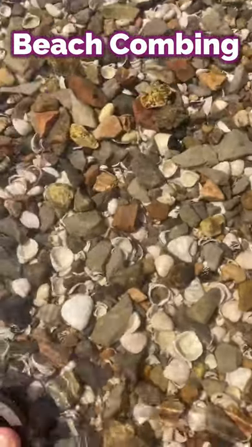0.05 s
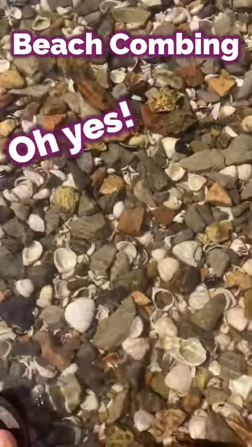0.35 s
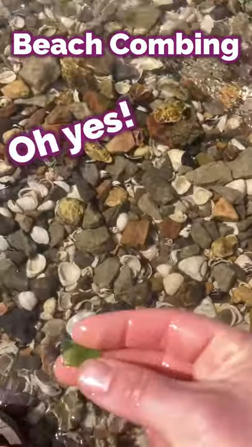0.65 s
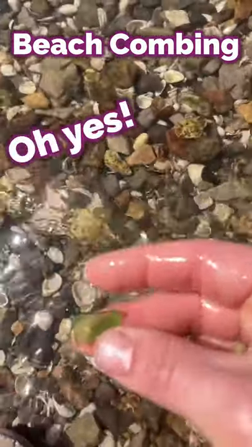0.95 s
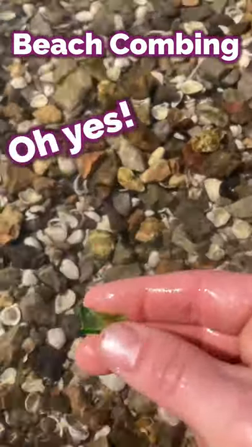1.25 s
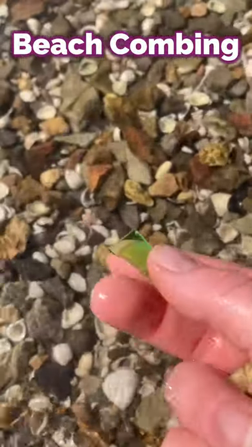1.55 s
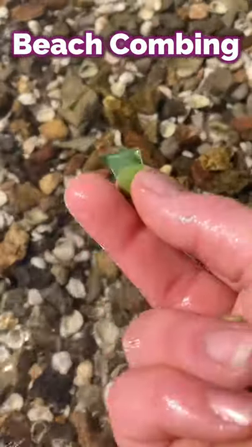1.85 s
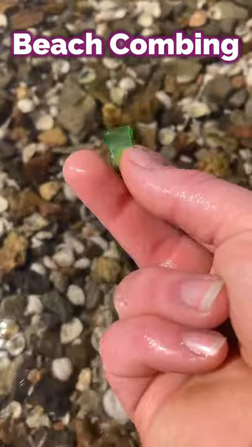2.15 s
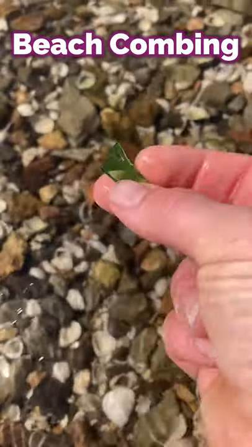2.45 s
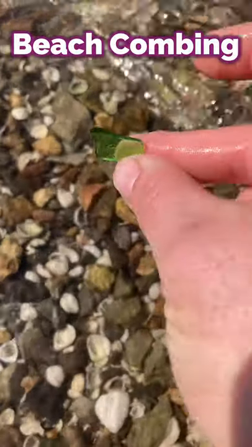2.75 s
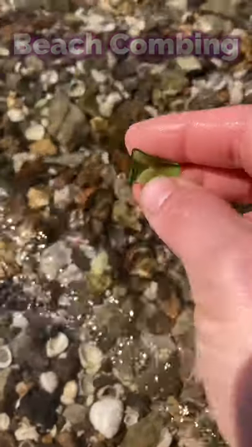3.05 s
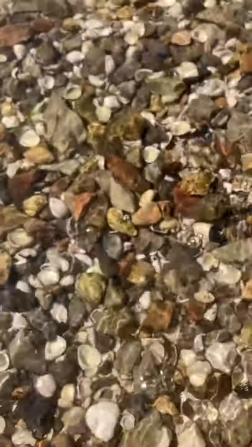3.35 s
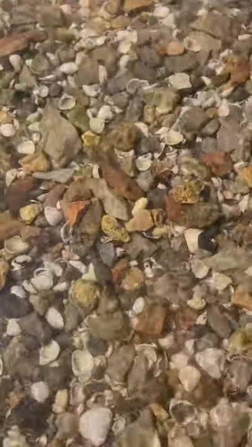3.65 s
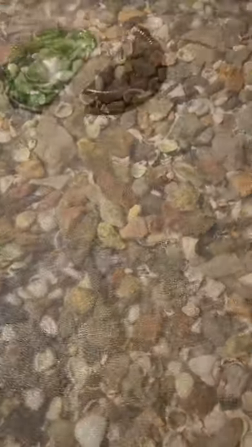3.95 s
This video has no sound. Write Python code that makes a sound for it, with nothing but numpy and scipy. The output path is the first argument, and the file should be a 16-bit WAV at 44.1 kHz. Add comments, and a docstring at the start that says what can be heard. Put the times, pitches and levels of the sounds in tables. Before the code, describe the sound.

Shallow seawater trickles and bubbles between stones close to a hand-held microphone, then sloshes and glugs as a fuller wavelet arrives. Wind rumbles and thumps softly on the microphone, with occasional pebble clicks and a faint sea murmur behind.

```python
"""Small waves lap over pebbles right below a hand-held phone. Bubbles ring as they surface, so the water
trickles, gurgles, fizzes and plinks over a soft wash. A fuller wavelet sloshes in during the second half, and
air squeezed between the stones glugs. The hand holding the phone scuffs on it, and pebble ticks, sprays and
thin whistles sound close by. The sea murmurs further off, and light wind rumbles and thumps on the phone's two
microphone openings (the ports)."""
import sys
import numpy as np
from scipy import signal
from scipy.fft import rfft, irfft
from scipy.io import wavfile
from scipy.ndimage import map_coordinates

SR = 44100
rng = np.random.default_rng(int(sys.argv[2]) if len(sys.argv) > 2 else 0)


def inscribe(sig):
    """Save sig as 16-bit PCM at rate SR to the path in sys.argv[1].

    A 1-D sig is mono; a 2-D sig holds one channel per row.
    Samples are clipped to [-1, 1] before scaling.
    """
    pcm = np.round(np.clip(np.atleast_2d(sig).T, -1, 1) * 32767)
    wavfile.write(sys.argv[1], SR, pcm.astype(np.int16))


N = 176400
BUBBLE_RISE = 0.018  # share of pitch a bubble gains while it fades to about a third


def undb(db):
    """Turn decibels into a gain."""
    return 10 ** (np.asarray(db) / 20)


def unit(x):
    """Scale to an average (rms) level of 1."""
    return x / np.sqrt(np.mean(x ** 2) + 1e-24)


def clock():
    """The time of every sample, in seconds."""
    return np.arange(N) / SR


def per_bin(points):
    """Join (Hz, value) points into a curve over all frequencies."""
    hz, value = np.array(points).T
    return np.interp(np.log(np.arange(N // 2 + 1) * SR / N + 1), np.log(hz), value)


def swell(curve):
    """Gain over time from (seconds, dB) points."""
    return undb(np.interp(clock(), *np.array(curve).T))


def colour(x, points):
    """Shape the tone with (Hz, dB) points; the result has level 1."""
    cepstrum = irfft(np.log(undb(per_bin(points))), N)
    cepstrum[1:N // 2] *= 2  # folded so the filter rings after a sound, never before
    cepstrum[N // 2 + 1:] = 0
    return unit(irfft(rfft(x) * np.exp(rfft(cepstrum)), N))


def noise(points):
    """Steady noise with the given tone."""
    return colour(rng.standard_normal(N), points)


def walk(rate):
    """Smooth random wandering of about 1 either way, at `rate` steps a second."""
    return map_coordinates(rng.standard_normal(4096), [clock() * rate], order=3, mode="wrap")


def add(out, start_s, sound):
    """Mix a short sound in at its time."""
    i = max(int(start_s * SR), 0)
    out[i:i + len(sound)] += sound[:max(N - i, 0)]


def resonate(x, hz, width_hz):
    """Let one band of a sound ring; the result has level 1."""
    band = signal.butter(2, [hz - width_hz / 2, hz + width_hz / 2], "band", fs=SR, output="sos")
    return unit(signal.sosfilt(band, x))


def knocks(table, rise_s, width):
    """Brief random pushes, each ringing in a broad band around its pitch."""
    out, t = np.zeros(N), clock()[:SR // 10]
    for start, hz, db in table:
        push = rng.standard_normal(len(t)) * t * np.exp(-t / rise_s)
        edges = [hz / (1 + width), min(hz * (1 + width), SR / 2 - 1)]
        ring = signal.sosfilt(signal.butter(3, edges, "band", fs=SR, output="sos"), push)
        add(out, start, undb(db) * ring / np.abs(ring).max())
    return out


def ports(x):
    """Sound from the ground reaches the two ports out of step, opposite at middle pitches."""
    # Each row: frequency in Hz, how far the left port leads in radians.
    phase = [(100, -27), (260, -3), (450, -2.5), (700, -4), (1100, -3), (2000, -3), (3200, -2),
             (3600, -1.67), (4000, 0.89), (6000, 0.5)]
    turn = np.exp(.5j * per_bin(phase))
    return np.array([irfft(rfft(x) * turn, N), irfft(rfft(x) / turn, N)])


def reflections(x, decay_s=0.0068):
    """Brief echoes from the stones, different at each port."""
    t = clock()[:SR // 20]
    echoes = rng.standard_normal((2, len(t))) * np.exp(-t / decay_s)
    return undb(-1.5) * np.array([signal.fftconvolve(x, e / np.linalg.norm(e))[:N] for e in echoes])


def bubble(hz, cycles, rise=BUBBLE_RISE, attack_cycles=3.3):
    """A ring that climbs as the bubble surfaces, fading to about a third in `cycles` vibrations."""
    turns = np.arange(int(6 * cycles * SR / hz)) * hz / SR
    age = turns / cycles
    attack = 1 - np.exp(-(turns / attack_cycles) ** 2)
    return np.sin(2 * np.pi * turns * (1 + rise * age / 2)) * np.exp(-age) * attack


def swarm(count, low_hz, high_hz, cycles, spread_db):
    """Bubbles of random size, strength and ring, scattered in time."""
    out = np.zeros(N)
    for when, size, strength, ring, glide in rng.random((count, 5)):
        hz = low_hz * (high_hz / low_hz) ** size
        gain = undb(spread_db * min(-np.log(strength), np.pi)) * np.sqrt(hz / low_hz)
        add(out, when * N / SR, gain * bubble(hz, cycles * 2 ** (2 * ring - 1), 2 * glide * BUBBLE_RISE))
    return out


def water(bubbles, tone, flow, wash_db, below=True):
    """Bubbles over a restless wash, swelling with the flow; `below` means right under the phone."""
    restless = undb(3.7 * walk(28.02))
    near = colour(bubbles, tone) + undb(wash_db) * restless * noise(tone)
    heard = ports(near) + undb(-8) * reflections(near) if below else near + reflections(near)
    return unit(heard) * swell(flow)


def trickle():
    """Water runs between the stones with ringing bubbles and clumps of crackle."""
    # Each row: time in seconds, level in dB.
    flow = [(0, -60.5), (.2, -64), (.45, -64), (.6, -62), (0.951, -65), (1.2, -57.5), (1.42, -61),
            (1.65, -73), (1.9, -63), (2.08, -74.5), (2.249, -59.5), (2.45, -64), (2.749, -54.5),
            (3.05, -58.5), (3.3, -59.5), (3.55, -59.5), (3.849, -64), (4, -62.5)]
    # Each row: frequency in Hz, level in dB.
    tone = [(200, -29.5), (500, -16), (800, -5), (1150, 3.5), (1650, 8.5), (2400, 2), (3200, -2.5),
            (4600, -8), (5600, -12.5), (7500, -33.5), (12000, -54)]
    bubbles = swarm(count=900, low_hz=850, high_hz=4800, cycles=6, spread_db=4.5)
    crackle = swarm(count=3000, low_hz=900, high_hz=5000, cycles=2, spread_db=4)
    clumps = unit(crackle * undb(3.24 * walk(60)))
    return water(unit(bubbles) + undb(-4) * clumps, tone, flow, wash_db=-7.5)


def gurgle():
    """Deeper bubbles ring in the wavelets."""
    # Each row: time in seconds, level in dB.
    flow = [(0, -81), (.45, -69.5), (.73, -56.5), (.87, -75), (1.13, -63.5), (1.6, -73), (2.15, -67),
            (2.27, -57), (2.36, -62), (2.52, -57), (2.68, -51), (2.88, -78), (3.01, -51.5), (3.2, -72),
            (3.52, -64), (4, -76)]
    # Each row: frequency in Hz, level in dB.
    tone = [(150, -12), (300, 0), (520, 0), (660, -5.5), (800, -13.5), (1000, -12.5), (1500, -23.5),
            (4000, -71.5)]
    bubbles = swarm(count=420, low_hz=300, high_hz=1200, cycles=4, spread_db=3)
    return water(bubbles, tone, flow, wash_db=-5)


def fizz():
    """Tiny bubbles ring in a thin sheet of water."""
    # Each row: time in seconds, level in dB.
    flow = [(0, -70), (.4, -73), (0.649, -69), (1, -76), (1.3, -70.5), (1.72, -75), (1.95, -72),
            (2.1, -78.5), (2.45, -68), (2.66, -65), (2.88, -87.5), (3.1, -68), (3.3, -71), (3.53, -64.5),
            (3.8, -69.5), (4, -69.5)]
    # Each row: frequency in Hz, level in dB.
    tone = [(800, -21.5), (2000, 5), (3300, 5), (4500, 4.5), (5400, -10.5), (6500, -9), (7600, -20),
            (10000, -31), (13000, -45.5)]
    bubbles = swarm(count=1600, low_hz=2400, high_hz=6000, cycles=5, spread_db=3.5)
    return water(bubbles, tone, flow, wash_db=-2, below=True)


def wind():
    """Gusts rumble on the ports."""
    # Each row: time in seconds, level in dB.
    gusts = [(0, -43.5), (.7, -42), (.88, -44), (1.1, -41), (1.42, -44), (1.65, -42), (2.05, -41),
             (2.35, -45), (2.65, -40.5), (2.85, -44.5), (2.93, -40.5), (3.2, -42), (3.42, -36.5),
             (3.62, -42.5), (3.76, -44.5), (4, -41.5)]
    # Rumble both ports share. Each row: frequency in Hz, level in dB.
    shared_tone = [(15, -20), (28, -8), (42, 0.5), (66, 1.5), (100, -1.5), (150, -11.5), (220, -18.5),
                   (320, -26.5), (480, -37), (800, -74), (1500, -85.5)]
    # Rumble that differs between them. Each row: frequency in Hz, level in dB.
    side_tone = [(15, -25.5), (30, -14.5), (60, -7), (100, 0), (150, -14.5), (220, -13.5), (320, -21),
                 (480, -37.5), (700, -58.5), (1500, -77)]
    shared, side = noise(shared_tone), undb(-8.5) * noise(side_tone)
    return unit(np.array([shared + side, shared - side])) * swell(gusts) * undb(walk(16))


def distant_sea():
    """The sea further off makes a softly wavering murmur."""
    # Each row: frequency in Hz, level in dB.
    tone = [(100, -11.5), (200, 4.5), (350, -2.5), (520, 12.5), (600, 2), (700, -31), (900, -19),
            (1500, -14.5), (4000, -37.5), (6000, -42), (8000, -38.5), (12000, -60)]
    murmur = ports(noise(tone)) + undb(-3) * np.array([noise(tone), noise(tone)])
    return undb(-61.5) * unit(murmur) * undb(2 * walk(14))


def scuffs(attack_s=0.0042):
    """Short rubs of a hand on the phone: a rasp over a hollow body, two rings, and fine grit on top."""
    # Each row: start, hold and fade in seconds, level in dB, body in dB, low ring in Hz and dB,
    # high ring in Hz and dB, grit in dB. Body, rings and grit are relative to the rasp.
    rubs = [(0.017, 0.025, 0.024, -47.5, -3.5, 1740, -11, 3600, -4.5, -26),
            (0.282, 0.055, 0.012, -49.5, 5.5, 2154, -3.5, 3900, -18, -38),
            (2.97, 0.018, 0.031, -54.5, -1.5, 1830, -1, 4370, -7.5, -29),
            (3.747, 0.023, 0.01, -57, -24, 2320, 0.5, 3930, -7, -15)]
    # Rings within the rasp. Each row: pitch in Hz, width in Hz, level in dB.
    rasp_rings = [(2580, 260, -2), (3250, 900, -1.5)]
    # The tones of the three parts. Each row: frequency in Hz, level in dB.
    rasp_tone = [(500, -41.5), (1250, -22), (1800, -21), (2300, -30), (2600, 4), (3400, -1.5), (4300, -1.5),
                 (5500, -7.5), (6800, -20.5), (8000, -45), (12500, -53)]
    body_tone = [(150, -10), (300, 2), (520, -7), (790, -41), (980, -8), (1120, -1), (1330, 0.5),
                 (1520, -8.5), (1750, -33), (3000, -75)]
    grit_tone = [(3000, -21), (6000, 9), (7500, -3.5), (9000, -11), (10500, -13), (12000, -53)]
    t, out = clock(), np.zeros(N)
    grain = undb(2.1 * walk(400))
    rub = lambda: grain * rng.standard_normal(N)
    ring = sum(undb(db) * resonate(rub(), hz, width) for hz, width, db in rasp_rings)
    rasp = unit(colour(rub(), rasp_tone) + undb(6) * unit(ring))
    body = colour(rub(), body_tone)
    grit = colour(rub() * undb(5.3 * walk(1400)), grit_tone)
    push = rub()
    for start, hold, fade, db, body_db, low_hz, low_db, high_hz, high_db, grit_db in rubs:
        shape = np.clip((t - start) / attack_s, 0, 1) * np.exp(-np.maximum(t - start - hold, 0) / fade)
        low = undb(low_db) * resonate(push, low_hz, 0.048 * low_hz)
        high = undb(high_db) * resonate(push, high_hz, 0.096 * high_hz)
        out += undb(db) * shape * (rasp + undb(body_db) * body + low + high + undb(grit_db) * grit)
    return out


def wind_thumps(top_hz=630):
    """Single puffs of wind hit the ports with a dull thump."""
    # Each row: start in seconds, pitch in Hz, level in dB.
    puffs = [(.04, 258, -44), (.243, 226, -39.5), (1.022, 340, -43), (1.035, 68.6, -36.5), (1.6, 71, -34),
             (1.745, 72.5, -35), (2.9, 58.7, -29.5), (2.975, 280, -38), (3.312, 380, -42.5),
             (3.322, 134, -26.5), (3.382, 376, -45), (3.398, 68, -35), (3.62, 61.3, -31.5),
             (3.893, 250, -40.5)]
    muffle = signal.butter(6, top_hz, fs=SR, output="sos")
    return signal.sosfilt(muffle, knocks(puffs, rise_s=0.0069, width=.55))


def whistles(pitch_fall=0.1):
    """Water draining away makes thin, wavering tones that slide down."""
    # Each row: start and length in seconds, starting pitch in Hz, level in dB.
    notes = [(0.067, 0.0465, 3160, -55), (0.199, 0.041, 3190, -68.5), (0.372, 0.067, 3135, -65.5),
             (0.52, 0.1, 3816, -66), (0.673, 0.055, 3250, -68), (0.746, 0.044, 3110, -64)]
    out = np.zeros(N)
    waver = 1 + walk(130) + 1j * walk(130)  # shakes both level and pitch
    for start, length, hz, db in notes:
        age = np.clip((clock() - start) / length, 0, 1)
        turns = np.cumsum(hz * (1 - pitch_fall * age)) / SR
        out += undb(db) * np.sin(np.pi * age) * np.real(waver * np.exp(2j * np.pi * turns))
    return out


def pebble_ticks():
    """Pebbles knock and ring very briefly. The tick at 3.767 s belongs to the hand's last scuff on the phone
    and gives it a crisp edge."""
    # Each row: start in seconds, pitch in Hz, level in dB.
    ticks = [(.2374, 3620, -42.5), (.238, 2140, -39.5), (.488, 4250, -47.5), (1.075, 4060, -58),
             (1.329, 3070, -56), (1.612, 5500, -63), (3.377, 4100, -49.5), (3.723, 3400, -36),
             (3.752, 3500, -41), (3.767, 3080, -38.5), (3.896, 4060, -53.5)]
    return knocks(ticks, rise_s=0.00075, width=.2)


def plinks(shed_count=6, shed_s=.028, flutter=0.31):
    """A wet splat traps a large bubble, which rings with a flutter and sheds small bubbles."""
    # Each row: start in seconds, pitch in Hz, level in dB, vibrations to fade to about a third.
    bubbles = [(0.487, 4940, -46, 10), (0.841, 2960, -41, 11), (0.844, 1662, -45.5, 22),
               (.872, 2200, -39, 3.2), (1.011, 904, -40.5, 1.9), (1.115, 1470, -43, 2.2),
               (1.123, 6020, -61.5, 25), (1.209, 1200, -47, 7), (1.211, 1860, -43, 10),
               (1.328, 3220, -51.5, 26), (1.445, 4830, -55.5, 20), (1.521, 1773, -34, 11.2),
               (1.888, 2510, -43, 9.9), (1.957, 2300, -58, 3.5), (2.159, 1920, -48, 13),
               (2.207, 2080, -46, 4.1), (2.219, 2420, -51, 13), (2.411, 604, -35.5, 5.9),
               (2.414, 1170, -45, 6.3), (2.479, 1453, -38, 7.5), (2.494, 501, -38.5, 6),
               (2.526, 462, -37, 5.4), (2.622, 522, -36.5, 2.8), (2.675, 455, -39, 4.4),
               (2.787, 848, -39.5, 10.4), (2.876, 3080, -59, 8.4), (3.03, 670, -32, 11),
               (3.082, 563, -39.5, 5.9), (3.285, 1430, -53, 7.1), (3.437, 2740, -50, 14),
               (3.511, 638, -39.5, 6), (3.565, 684, -36, 10.4), (3.969, 2100, -43, 3.1)]
    out = np.zeros(N)
    for start, hz, db, cycles in bubbles:
        add(out, start, undb(db) * bubble(hz, cycles))
        for when, size, strength in rng.random((shed_count, 3)):
            shed_hz = min(hz * 2 ** (1.3 * size - .4), 5500)
            add(out, start + when ** 2 * shed_s, undb(db - 5.5) * strength * bubble(shed_hz, cycles=3.2))
    contacts = [(start - 0.00099, hz, db - 9.5) for start, hz, db, _ in bubbles]
    splats = knocks(contacts, rise_s=0.0018, width=0.36)
    return out * (1 + flutter * walk(600)) + splats


def sprays():
    """Water breaks over stones: a crackling hiss jumps up and sinks back."""
    # Each row: start and length in seconds, level in dB.
    bursts = [(0.704, 0.04, -65.5), (1.808, 0.097, -63.5), (2.502, 0.032, -57.5), (2.964, 0.058, -60.5),
              (3.211, 0.032, -59.5), (3.514, .11, -66)]
    # Each row: frequency in Hz, level in dB.
    tone = [(900, 8), (2000, -4.5), (3400, -17), (4300, 5.5), (5000, 4), (5400, -11.5), (6200, -4.5),
            (7200, -19), (8200, -23.5), (10500, -31), (12000, -68)]
    out = np.zeros(N)
    hiss = colour(undb(1.7 * walk(810)) * rng.standard_normal(N), tone)
    for start, length, db in bursts:
        age = np.clip((clock() - start) / length, 0, 1)
        out += undb(db) * hiss * np.sqrt(np.abs(np.sin(np.pi * np.sqrt(age))))
    return out


def slosh():
    """A fuller wavelet runs in from further out, full of low bubbles."""
    # Each row: time in seconds, level in dB.
    flow = [(2.301, -73.5), (2.55, -57.5), (2.85, -62.5), (3.01, -51.5), (3.199, -66.5), (3.38, -51.5),
            (3.47, -56), (3.58, -55), (3.75, -60.5), (3.92, -58.5)]
    # Each row: frequency in Hz, level in dB.
    tone = [(150, -7), (300, 4), (500, 6.5), (670, 7), (790, -4.5), (1050, -21.5), (2000, -34),
            (8000, -79.5)]
    bubbles = swarm(count=900, low_hz=240, high_hz=820, cycles=4.5, spread_db=2.5)
    return water(bubbles, tone, flow, wash_db=-3.5, below=False)


def glugs(length_s=.035, pitch_rise=.28, flutter=.35):
    """Air squeezed up between the stones makes a fluttering note that climbs as its pocket shrinks."""
    # Each row: start in seconds, starting pitch in Hz, level in dB.
    pockets = [(2.335, 1600, -53), (2.658, 1450, -42.5), (2.783, 1620, -53), (3.073, 1360, -50),
               (3.17, 1950, -52), (3.218, 1400, -48), (3.432, 1050, -52), (3.508, 1170, -48)]
    out = np.zeros(N)
    for start, hz, db in pockets:
        age = np.clip((clock() - start) / length_s, 0, 1)
        turns = np.cumsum(hz * (1 + pitch_rise * age ** 2)) / SR
        out += undb(db) * np.sin(np.pi * np.sqrt(age)) ** 2 * np.sin(2 * np.pi * turns)
    return out * (1 + flutter * walk(300))


def scene():
    """Mix water, close sounds and wind, with the left side a little louder."""
    wavelets = trickle() + gurgle() + slosh() + fizz()
    close = plinks() + sprays() + whistles() + scuffs() + pebble_ticks()
    ground = wavelets + ports(close) + undb(-7.5) * reflections(close)
    return (ground + wind() + wind_thumps() + distant_sea()) * undb([[.25], [-.25]])


def record(dry, top_hz=14900):
    """The phone's microphones add a faint hiss, and the highest treble is cut."""
    # Each row: frequency in Hz, level in dB.
    tone = [(1000, -5), (7000, -4.5), (10000, 2), (12000, -9), (15000, -0.5)]
    hiss = undb(-90) * np.array([noise(tone), noise(tone)])
    return signal.sosfilt(signal.ellip(8, .2, 70, top_hz, fs=SR, output="sos"), dry + hiss)


dry = scene()
out = record(dry)
inscribe(out)
```